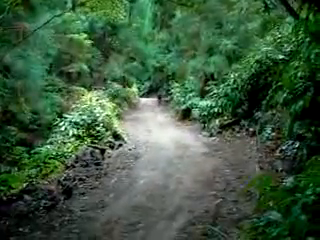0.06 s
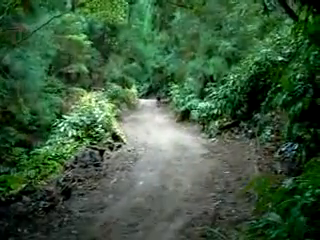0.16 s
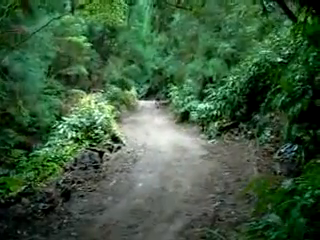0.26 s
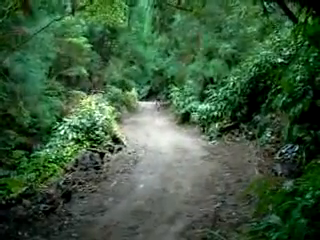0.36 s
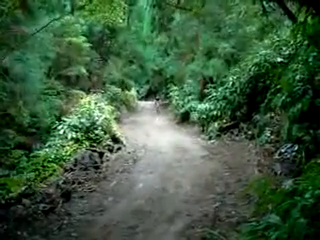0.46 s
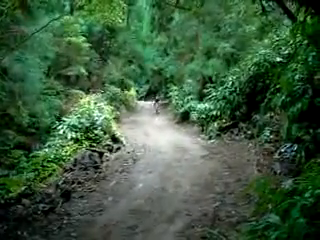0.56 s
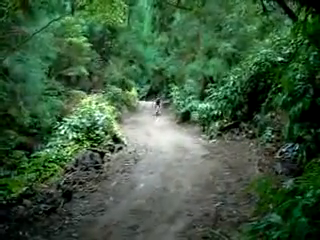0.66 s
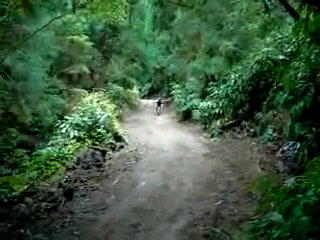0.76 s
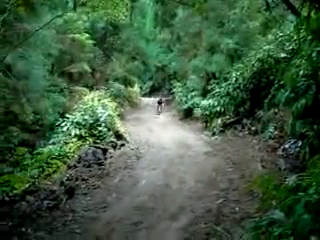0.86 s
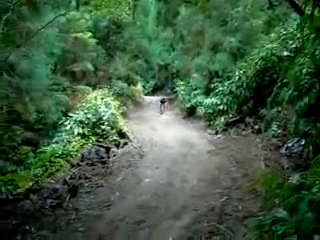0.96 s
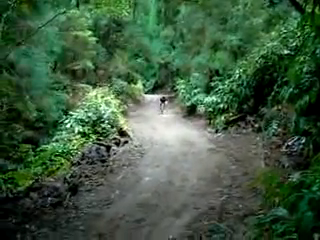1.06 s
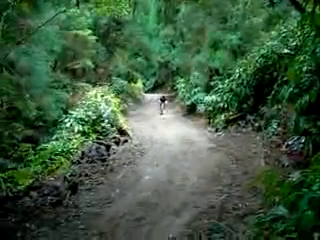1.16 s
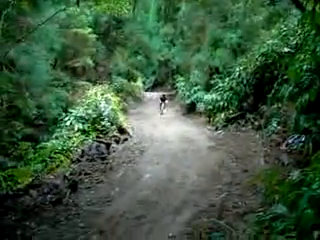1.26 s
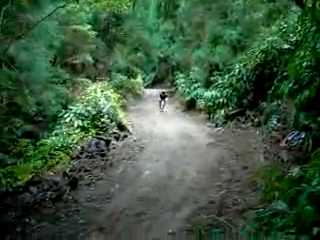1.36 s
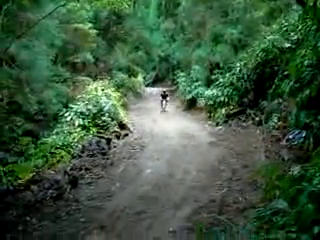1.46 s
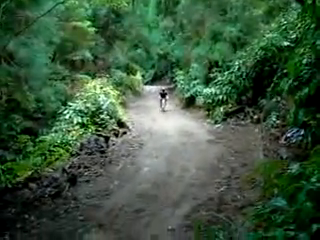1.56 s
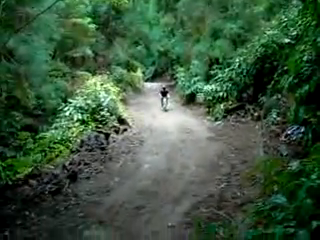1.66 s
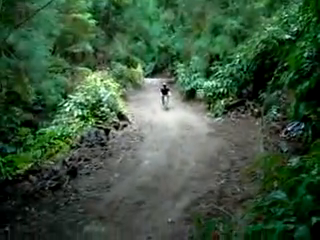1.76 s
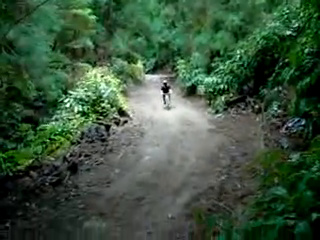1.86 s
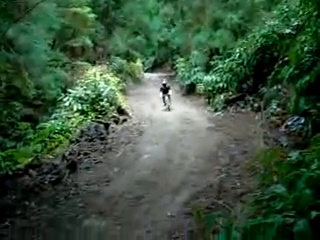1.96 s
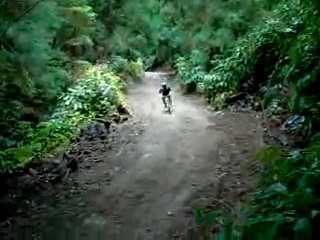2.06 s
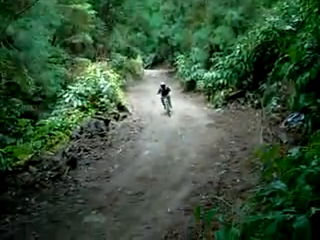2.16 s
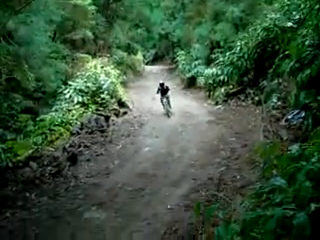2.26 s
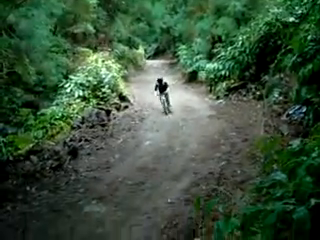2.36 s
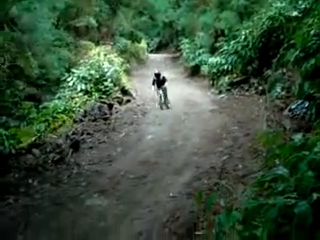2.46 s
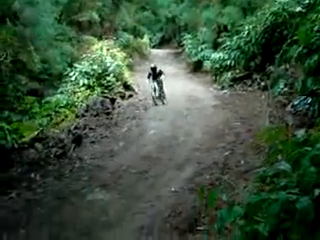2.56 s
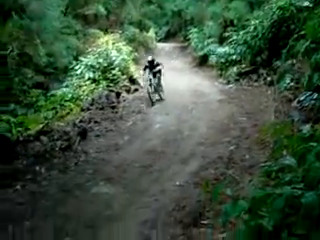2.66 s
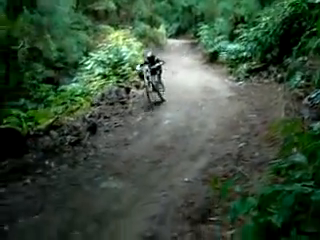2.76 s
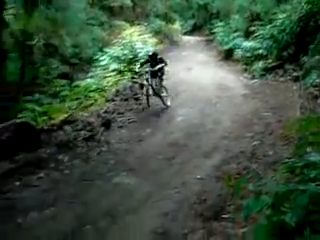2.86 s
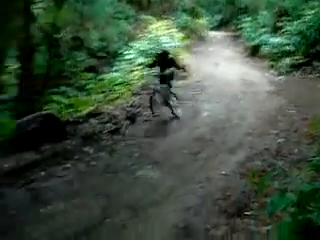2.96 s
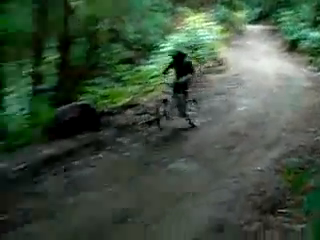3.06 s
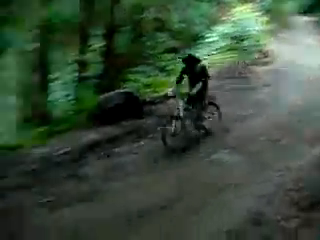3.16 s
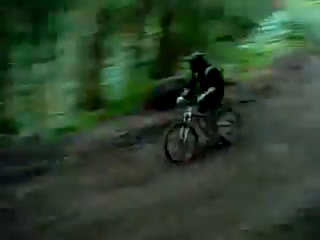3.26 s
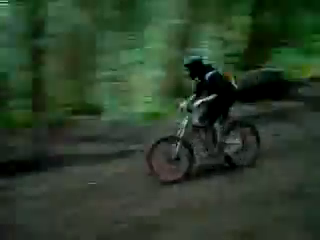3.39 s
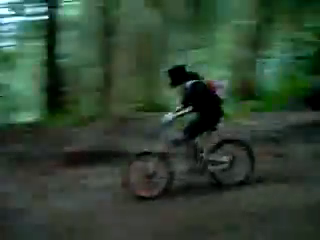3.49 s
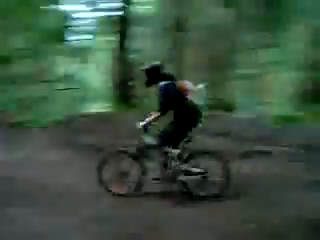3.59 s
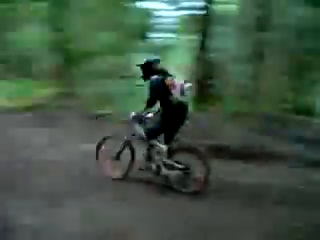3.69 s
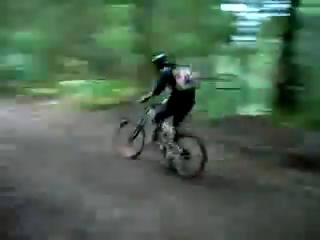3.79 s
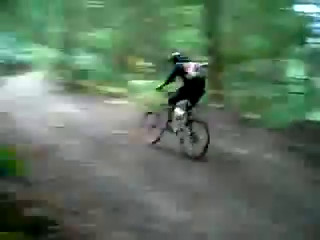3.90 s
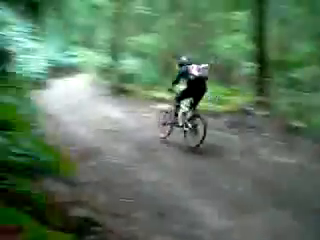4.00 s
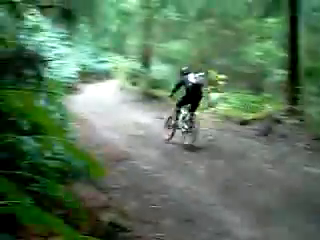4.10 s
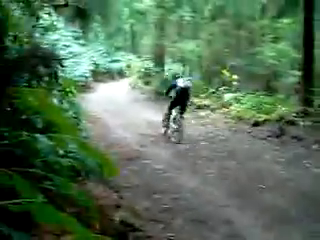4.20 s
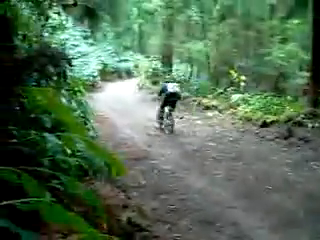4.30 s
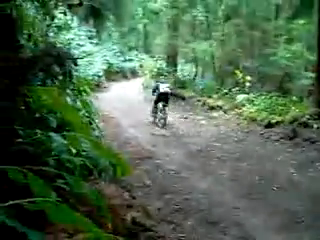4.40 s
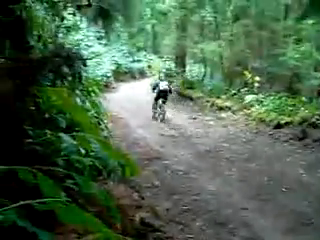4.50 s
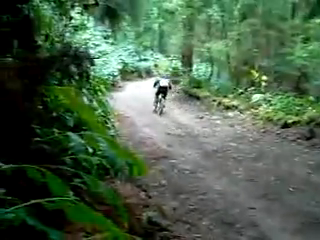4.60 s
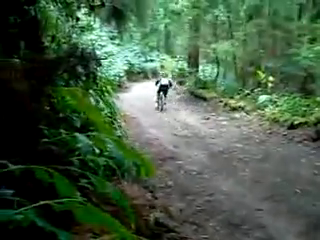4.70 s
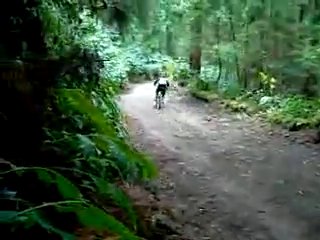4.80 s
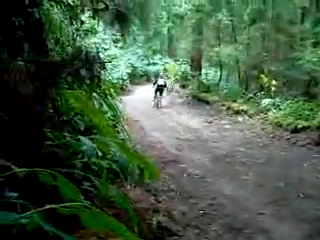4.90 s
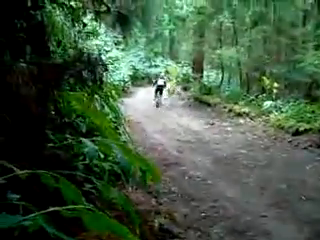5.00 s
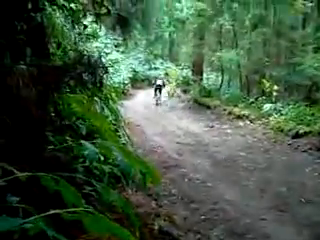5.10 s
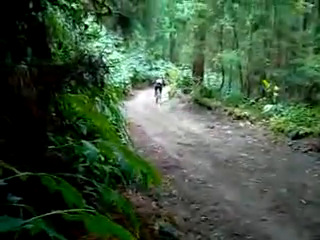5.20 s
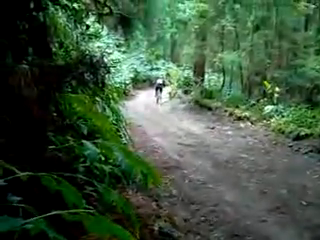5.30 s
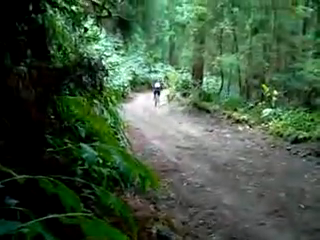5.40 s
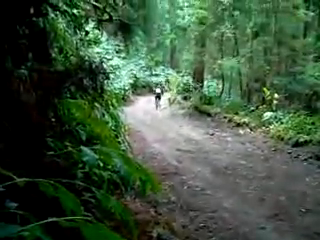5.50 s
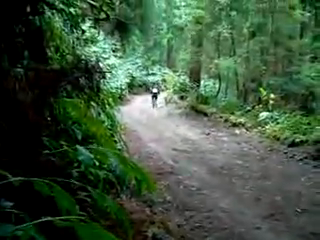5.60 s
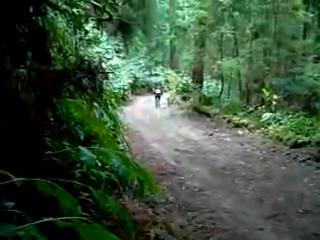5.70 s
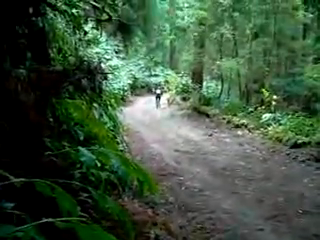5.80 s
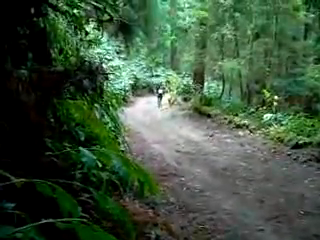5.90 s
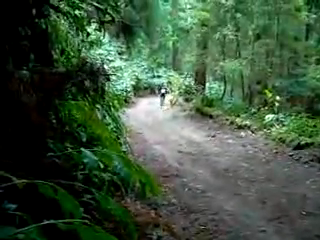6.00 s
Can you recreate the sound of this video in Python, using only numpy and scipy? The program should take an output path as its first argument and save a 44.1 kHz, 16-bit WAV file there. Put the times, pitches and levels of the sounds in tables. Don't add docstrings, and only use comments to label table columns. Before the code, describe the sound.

Outdoors on a loose dirt forest trail, a bicycle approaches from far off: faint grit and tread roll, then separate crunchy bursts with sharp pebble ticks. It skids past very close, spraying stones that snap and distort the small microphone, with hollow tyre knocks underneath. Then the crunching thins to a few ticks and soft receding roll. Low-fidelity, narrow, midrange sound, with faint wind buffeting.

```python
import sys
import numpy as np
from scipy import signal
from scipy.fft import rfft, irfft, next_fast_len
from scipy.io import wavfile
from scipy.ndimage import uniform_filter1d, map_coordinates

SR = 44100
rng = np.random.default_rng(int(sys.argv[2]) if len(sys.argv) > 2 else 0)


def output_pcm(signal):
    pcm = np.clip(np.atleast_2d(signal).T, -1, 1) * 32767
    wavfile.write(sys.argv[1], SR, np.round(pcm).astype(np.int16))


def linear_from_db(decibels):
    return 10 ** (np.asarray(decibels, float) / 20)


N = 266794

# freq_hz, level_db
WIND_HZ_DB = [(8, -8), (25, 0), (45, -3), (80, -8), (120, -11), (200, -20), (400, -40)]
# time_s, level_db
GUSTS_S_DB = [(0.0, -54), (0.12, -57), (2.21, -54.5), (2.68, -49.5), (2.96, -53.5), (3.2, -39.5),
              (3.82, -42.5), (4.04, -57.5), (4.33, -41), (4.8, -53), (4.95, -44.5), (5.41, -63.5),
              (5.48, -47.5), (6.05, -55)]
# freq_hz, t60_s
TREES_HZ_S = [(300, 0.43), (1000, 0.13), (2500, 1), (5000, 0.53)]
# freq_hz, level_db
FRAME_HZ_DB = [(60, -10), (130, -7), (255, 6), (310, 4.5), (410, -4), (520, -34)]
# freq_hz, width_hz, level_db
FRONT_MODES = [(437, 234, -4), (601, 98, 4), (1035, 320, -1.5)]
# freq_hz, width_hz, level_db
REAR_MODES = [(589.6, 120, 1), (723, 200, 2.5), (1170, 280, -8.5)]
# freq_hz, width_hz, level_db
RIM_MODES = [(1320, 64, 0.5), (2020, 91, 2), (2650, 140, -2), (3370, 390, -4.5)]
# time_s, rear_share_0_1
REAR_SHARE_S = [
    (0, 0),
    (2.3, 0.09),
    (3.2, 0.8),
    (4.001, 0.86),
    (6.05, 0.9),
]
# time_s, level_db
ROLLING_S_DB = [(0, -50), (.5, -43.5), (.65, -48), (.8, -44.5), (2.0, -35), (2.83, -36), (2.95, -31),
                (3.5, -26), (3.9, -24.5), (4.03, -30), (4.22, -32.5), (5.2, -35.5), (5.3, -37.5),
                (5.42, -36), (6.05, -40)]
# freq_hz, level_db
TREAD_HZ_DB = [(700, -26.5), (1300, -15.5), (1650, -11), (1850, -5.5), (2300, -2.5), (2650, 0), (3300, -2),
               (4000, -33.5), (4500, -30.5)]
# freq_hz, level_db
GRIT_HZ_DB = [(900, -23), (1200, -9.5), (1450, -4), (1720, -5.5), (1900, -4), (2300, -1.5), (3500, 1.5),
              (3900, -16), (4300, -36.5)]
# freq_hz, level_db
SPRAY_HZ_DB = [(2700, -17), (3300, -6.5), (3800, 1.5), (4300, -5), (4650, -14), (5000, -22.5), (5400, -30)]
# start_s, length_s, grit_db, casing_re_grit_db, fine_share_0_1
BITES = [(0, .13, -46, -5.5, .7), (0.129, 0.24, -44.5, -1.5, 0.8), (0.8, 0.082, -39.5, -5, 0.8),
         (0.882, 0.15, -32.5, -8, .6), (1.051, 0.18, -35, -11, .6), (1.273, 0.15, -36, -13, 0.5),
         (1.399, .2, -33, -9, 0.67), (1.638, 0.2, -34.5, -7.5, .6), (1.857, 0.29, -30, -9.5, 0.92),
         (2.193, 0.095, -29, -10.5, 0.4), (2.301, 0.22, -25, -9.5, 0.67), (2.552, 0.16, -27.5, -9, 0.63),
         (3.038, 0.34, -27.5, -6.5, 0.7), (3.207, 0.16, -13, -8.5, 0.52), (3.405, 0.17, -19, -11, 0.67),
         (3.605, 0.21, -19.5, -8, 0.75), (4.228, .14, -24.5, -10, 0.7), (4.377, .11, -25.5, -7.5, 0.7),
         (4.491, .2, -30, -9, 0.69), (4.722, 0.22, -32.5, -6.5, .4), (4.93, 0.22, -32.5, -4.5, .45),
         (5.423, .13, -37.5, -8, 0.1), (5.561, 0.2, -33, -2.5, 0.21), (5.801, .3, -34, -5.5, .45)]
# start_s, peak_db, pitch_hz, body_re_peak_db
PEBBLES = [(0.02, -24, 2910, -20), (0.805, -19, 2610, -16), (0.8794, -12.5, 2480, -15),
           (1.1932, -24.5, 1940, -14), (1.286, -19, 2760, -31), (1.3346, -15.5, 2820, -16.5),
           (1.363, -11, 3410, -21), (1.6814, -16.5, 3460, -19), (1.860, -18, 2610, -24.5),
           (1.918, -5.5, 3430, -26), (2.308, -6.5, 3190, -36), (2.356, -12.5, 3200, -8),
           (2.389, -8.5, 2630, -29), (3.045, 0.5, 2760, -13.5), (3.088, -5.5, 2370, -23.5),
           (3.121, 2.5, 2685, -22), (3.164, -0.5, 2730, -28), (3.2163, 4.5, 2000, -10.5),
           (3.6062, -2.8, 2264, -3.5), (3.688, 5.5, 2114, -13.5), (3.8039, 7, 2720, -16),
           (4.2288, -0.5, 3470, -25), (4.296, -6, 2960, -16.5), (4.462, -9, 2810, -1.5),
           (4.6327, -12.5, 2106, -18), (4.876, -13.5, 1817, -4.5), (5.509, -18, 2604, -9.5),
           (5.650, -16, 1995, -9), (5.877, -15, 2390, -17), (5.556, -15.5, 2890, -18)]
# time_s, overload_db, pitch_hz
CLOSE_STONES = [(3.2215, 1.5, 2370), (3.2598, -0.5, 2525), (3.273, 1.2, 2550), (3.3037, 0.7, 2015),
                (3.3144, 1.5, 3040), (3.3258, 3, 2640), (3.3253, 2.2, 1590), (3.3297, 1, 2480),
                (3.338, 0, 2360), (3.341, 1, 2150), (3.379, 1.5, 2156), (3.6097, 1.5, 2080),
                (3.6921, 3, 2010), (3.6957, 3.6, 2040), (3.699, 2, 2240), (3.707, 0.9, 2360),
                (3.8065, 1.85, 2445), (3.8084, 2.5, 2750), (4.4637, 0.5, 1670)]
# freq_hz, level_db
IMAGE_HZ_DB = [(4000, 0), (4200, -5), (4520, -14), (4840, -25), (5160, -38), (5320, -53), (5400, -68)]
# freq_hz, level_db
PUSH_HZ_DB = [(300, -27.5), (480, 4.0), (1300, -2.5), (2000, -21.5)]
# freq_hz, level_db
SNAP_HZ_DB = [(500, -25.5), (1500, -8), (3000, 1.5), (4400, -5), (5300, -15.5)]
# freq_hz, level_db
CLICK_HZ_DB = [(300, -4.5), (1200, 3.0), (3600, 2.5), (4600, -10.0), (9000, -21.5)]

BITE_S, LET_GO_DB_PER_S = 0.017, 136.5
ROLL_CASING_DB, ROLL_SPRAY_DB, ROLL_FRAME_DB = -18.5, -7, -24.5
ROLL_FINE_SHARE, ROLL_DULLS_SHARE = 0.35, 0.14
SPRAY_DB, SPRAY_FINE_DB = -19.5, 19.5
FRAME_DB, FRAME_REAR_DB = -13.5, 2
SNAP_DB = -9.5
SWELL_S, SPATTER_S, THUD_DB = 0.0027, 0.017, -13
SMALL_DB, SMALL_SPREAD_DB = 10.5, 3
SMALL_HZ, SMALL_BODY_DB = 2550, -21.5
FULL = 0.7
SAMPLED_HZ, TOP_HZ = 8000, 5400
EDGE_HZ, EDGE_DB = 3766, -6


def unit(x):
    return x / np.sqrt(np.mean(x ** 2) + 1e-20)


def noise():
    return rng.standard_normal(N)


def over_time(points):
    return np.interp(np.arange(N) / SR, *np.transpose(points))


def along(points, hz):
    f, v = np.transpose(points)
    return np.interp(np.log(hz + 1), np.log(f + 1), v, left=v[0] - 60, right=v[-1] - 60)


def wobble(rate_hz):
    knots = rng.standard_normal(int(N * rate_hz / SR) + 4)
    return map_coordinates(knots, [np.arange(N) * rate_hz / SR])


def filtered(x, response):
    m = next_fast_len(N + SR // 2)
    return irfft(rfft(x, m) * response(np.fft.rfftfreq(m, 1 / SR)), m)[:N]


def coloured(x, spectrum):
    def response(hz):
        cepstrum = irfft(np.log(linear_from_db(along(spectrum, hz)) + 1e-5))
        half = len(cepstrum) // 2
        cepstrum[1:half] *= 2
        cepstrum[half + 1:] = 0
        return np.exp(rfft(cepstrum))
    return filtered(x, response)


def modes(x, table):
    def response(f):
        total = 0
        for k, (c, w, db) in enumerate(table):
            total = total + (-1) ** k * linear_from_db(db) * 1j * f * w / (c * c - f * f + 1j * f * w)
        return total
    return filtered(x, response)


def steady(x):
    return x / np.sqrt(np.abs(uniform_filter1d(x ** 2, SR // 6)) + 1e-12)


def patchy(x, depth_db):
    z = signal.stft(x, nperseg=512)[2]
    field = uniform_filter1d(rng.standard_normal(z.shape), size=4, axis=0)
    field = uniform_filter1d(field, size=9, axis=1)
    return unit(signal.istft(z * linear_from_db(depth_db * unit(field)), nperseg=512)[1][:N])


def wind():
    level_db = over_time(GUSTS_S_DB) - 1.0 + 1.5 * wobble(3.7) + 0.95 * wobble(42)
    return linear_from_db(level_db) * unit(coloured(noise(), WIND_HZ_DB))


def trees(x):
    hz, t, z = signal.stft(rng.standard_normal(SR // 2), SR, nperseg=256)
    t60_s = np.interp(hz, *np.transpose(TREES_HZ_S))
    tail = signal.istft(z * linear_from_db(-60 * t / t60_s[:, None]), SR, nperseg=256)[1]
    return signal.fftconvolve(np.pad(x, (500, 0)), tail / np.linalg.norm(tail))[:N]


def casing(x):
    rear = over_time(REAR_SHARE_S)
    return np.sqrt(1 - rear) * modes(x, FRONT_MODES) + np.sqrt(rear) * modes(x, REAR_MODES)


def crackle(per_s, spread_db, cap_db, clump_db):
    draw = rng.random((3, N))
    clumps_db = clump_db * (wobble(45) + wobble(140))
    size = linear_from_db(np.minimum(clumps_db - spread_db * np.log(draw[1] + 1e-9), cap_db))
    return steady(size * np.sign(draw[2] - 0.5) * (draw[0] < per_s / SR))


def graded(x, fine):
    def rim(f):
        return linear_from_db(sum(db / (1 + ((f - c) / w) ** 2) for c, w, db in RIM_MODES))
    rung = filtered(x, rim)
    low = filtered(rung, lambda f: np.clip((3100 - f) / 1200, 0, 1))
    return unit(np.sqrt(1 - fine) * low + np.sqrt(fine) * (rung - low))


def ride():
    t = np.arange(N) / SR
    roll = linear_from_db(2 * over_time(ROLLING_S_DB))
    grit, body, spray, fine = np.zeros((4, N))
    for s, length_s, db, casing_db, share in BITES:
        fall_db = LET_GO_DB_PER_S * np.maximum(t - s - length_s, 0)
        bite = np.clip((t - s) / BITE_S, 0, 1) * linear_from_db(2 * (db - fall_db))
        grit = grit + bite
        fine = fine + share * bite
        body = body + bite * linear_from_db(2 * casing_db)
        spray = spray + bite * linear_from_db(2 * (SPRAY_DB + SPRAY_FINE_DB * share))
    roll_fine = ROLL_FINE_SHARE - ROLL_DULLS_SHARE * over_time(REAR_SHARE_S)
    return roll, grit, body, spray, np.clip((fine + roll_fine * roll) / (grit + roll), 0, 1)


def tyres():
    rolling, biting, ringing, spraying, fine = ride()
    dig = biting / (biting + rolling)
    rear = over_time(REAR_SHARE_S)
    breaks = crackle(per_s=3000, spread_db=3.5, cap_db=18, clump_db=3.0)

    def level(power, roll_db):
        return np.sqrt(power + rolling * linear_from_db(2 * roll_db))

    def drive(share):
        return np.sqrt(dig * share) * breaks + np.sqrt(1 - dig * share) * noise()

    tread = unit(coloured(noise(), TREAD_HZ_DB))
    grit = np.sqrt(dig) * unit(coloured(drive(0.85), GRIT_HZ_DB)) + np.sqrt(1 - dig) * tread
    grit = level(biting, 0) * patchy(graded(grit, fine), depth_db=2.0)
    body = level(ringing, ROLL_CASING_DB) * unit(casing(coloured(drive(1.0), PUSH_HZ_DB)))
    spray = level(spraying, ROLL_SPRAY_DB - 6 * rear) * unit(coloured(drive(0.75), SPRAY_HZ_DB))
    shaking = ringing * linear_from_db(2 * (FRAME_DB + FRAME_REAR_DB * rear))
    frame = level(shaking, ROLL_FRAME_DB) * unit(coloured(drive(0.55), FRAME_HZ_DB))
    snaps = coloured(crackle(per_s=140, spread_db=3.0, cap_db=14.5, clump_db=-1.5), SNAP_HZ_DB)
    snaps = linear_from_db(SNAP_DB) * np.sqrt(biting) * unit(snaps)
    return grit + body + spray + frame + snaps


def small_stones(count):
    draw = rng.standard_normal((count, 4))
    at = (np.arange(count) + 0.5 + 0.4 * draw[:, 0]) * N / count
    at = np.clip(at, 0, N - 1).astype(int)
    grit_db = 10 * np.log10(ride()[1][at] + 1e-12)
    peak_db = grit_db + SMALL_DB + SMALL_SPREAD_DB * np.tanh(draw[:, 1])
    pitch_hz = np.clip(SMALL_HZ * np.exp(0.42 * draw[:, 2]), 1200, 4200)
    return list(zip(at / SR, peak_db, pitch_hz, SMALL_BODY_DB + 5 * draw[:, 3]))


def stones():
    bright, knock = np.zeros((2, N + SR))
    t = np.arange(SR // 10) / SR
    swell = (1 - 0.92 * np.exp(-t / SWELL_S)) * linear_from_db(-20 * t / SPATTER_S)
    for s, db, hz, body_db in [*PEBBLES, *small_stones(count=45)]:
        spatter = swell * linear_from_db(2.27 * rng.standard_normal(len(t))) * rng.standard_normal(len(t))
        spatter[round(0.002 * SR)] += 6.5
        click = signal.lfilter(*signal.iirpeak(hz, 1.2, SR), spatter)
        peak = np.abs(click).max()
        bright[round(s * SR):][:len(t)] += linear_from_db(db + 1.9) * click / peak
        knock[round(s * SR):][:len(t)] += linear_from_db(db + body_db + 12.0) * spatter / peak
    bright, knock = bright[:N], knock[:N]
    thud = linear_from_db(THUD_DB) * coloured(knock, FRAME_HZ_DB)
    return coloured(bright, CLICK_HZ_DB) + casing(knock) + thud


def cracks(x):
    out = x.copy()
    t = np.arange(-50, 51) / SR
    bell = np.cos(np.pi * t / (2 * t[-1])) ** 2
    for s, db, hz in CLOSE_STONES:
        here = slice(round(s * SR) - 50, round(s * SR) + 51)
        ring = FULL * linear_from_db(db) * rng.choice([-1, 1]) * np.cos(2 * np.pi * hz * t)
        out[here] = out[here] * (1 - bell) + bell * ring
    return out


def scene():
    bike = tyres() + stones()
    mix = bike + linear_from_db(-16) * trees(bike) + wind()
    held = mix / (1 + np.abs(mix / 0.55) ** 5) ** (1 / 5)
    return cracks(held)[None]


def sampled(x):
    half_hz = SAMPLED_HZ / 2

    def kept_filter(hz):
        return (hz < half_hz) * linear_from_db(EDGE_DB * np.clip((hz - EDGE_HZ) / (half_hz - EDGE_HZ), 0, 1))

    def image_filter(hz):
        return (hz > half_hz) * (hz < TOP_HZ) * linear_from_db(along(IMAGE_HZ_DB, hz))

    kept = filtered(x, kept_filter)
    mirror = 2 * kept * np.cos(2 * np.pi * SAMPLED_HZ * np.arange(N) / SR)
    return kept + filtered(mirror, image_filter)


def overtones(clipping):
    def upper(hz):
        return np.clip((hz - TOP_HZ) / 300, 0, 1) * np.clip((10200 - hz) / 400, 0, 1)
    window = np.hanning(3800) ** 3
    power = signal.fftconvolve(filtered(clipping, upper) ** 2, window / window.sum(), "same")
    hiss = unit(filtered(noise(), lambda hz: upper(hz) * (TOP_HZ / (hz + 1)) ** 2.4))
    return np.sqrt(np.abs(power)) * hiss


def roll_off(x):
    return signal.sosfilt(signal.butter(12, 15870, fs=SR, output="sos"), x)


def record(dry):
    narrow = sampled(dry[0])
    clipped = np.clip(narrow, -FULL, FULL)
    dulled = filtered(clipped, lambda hz: linear_from_db(-16 * np.clip((hz - 9800) / 400, 0, 1)))
    mix = dulled + linear_from_db(-11) * overtones(clipped - narrow)
    return roll_off(mix[None])


dry = scene()
out = record(dry)
output_pcm(out)
```